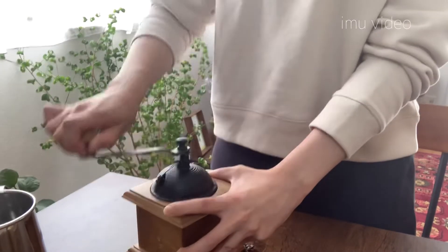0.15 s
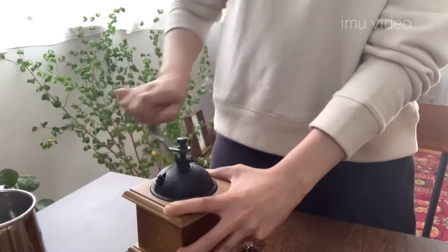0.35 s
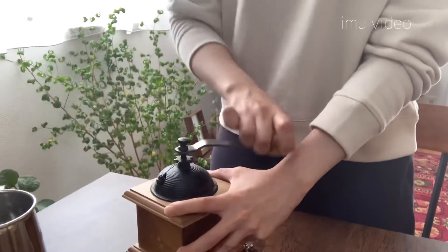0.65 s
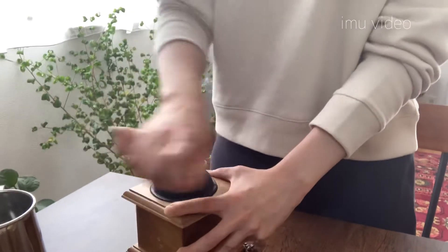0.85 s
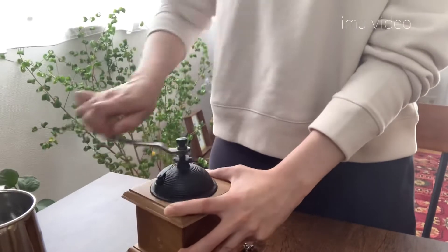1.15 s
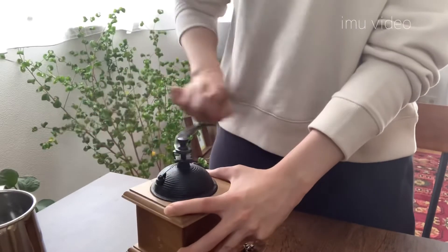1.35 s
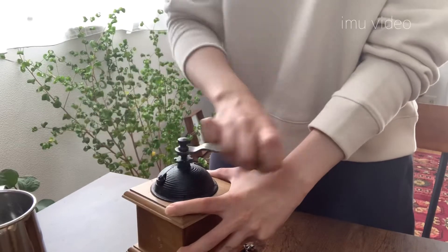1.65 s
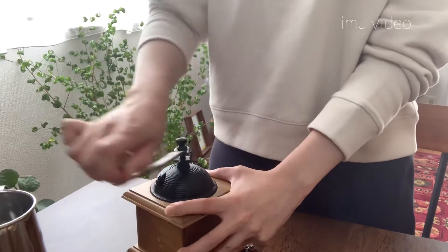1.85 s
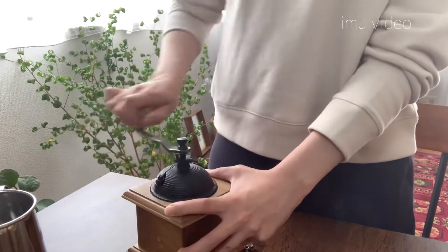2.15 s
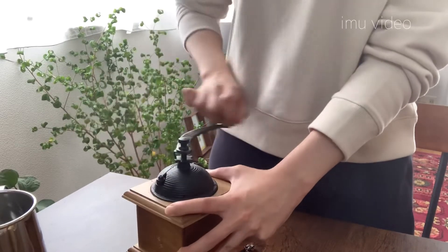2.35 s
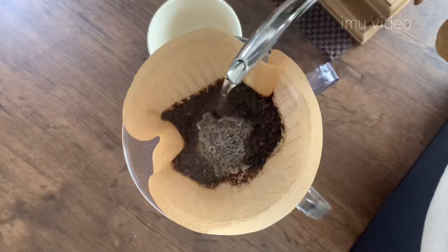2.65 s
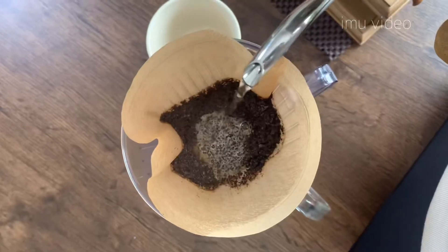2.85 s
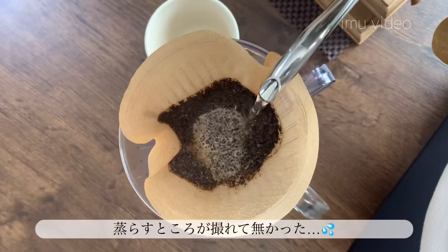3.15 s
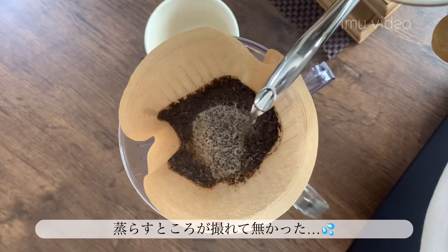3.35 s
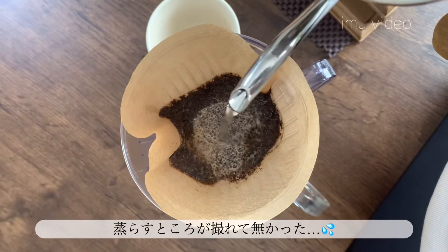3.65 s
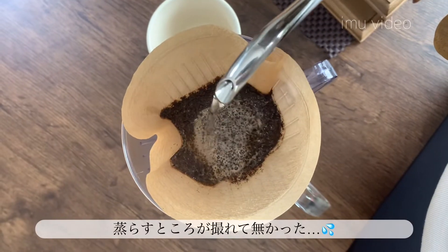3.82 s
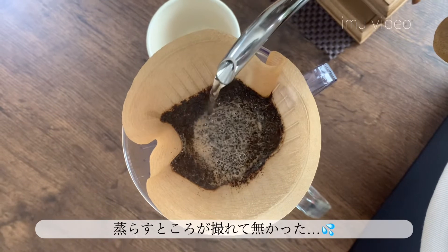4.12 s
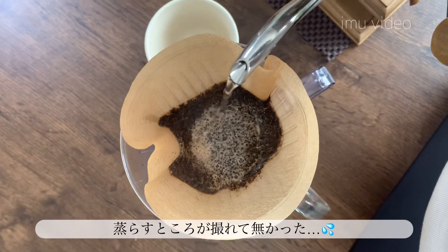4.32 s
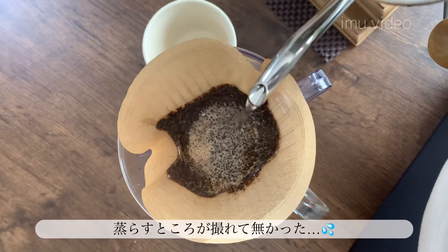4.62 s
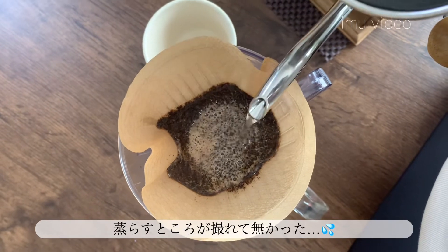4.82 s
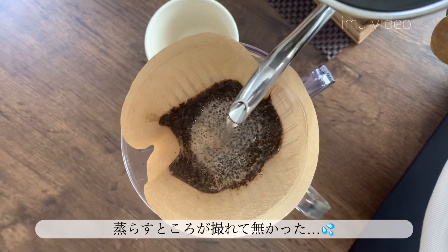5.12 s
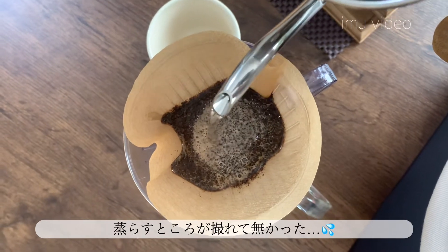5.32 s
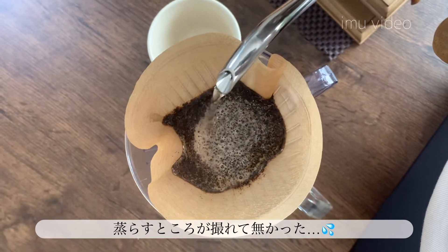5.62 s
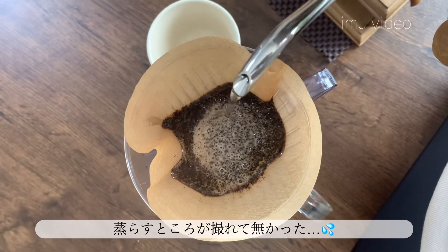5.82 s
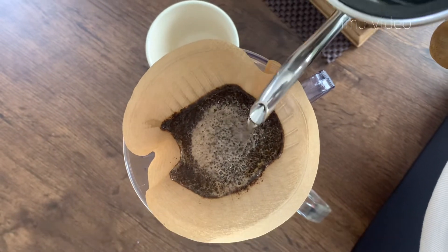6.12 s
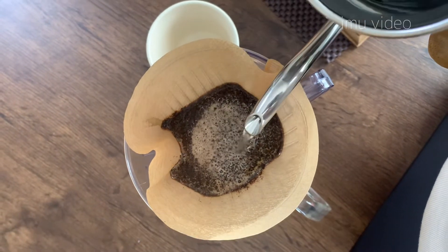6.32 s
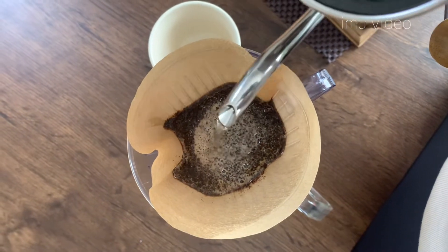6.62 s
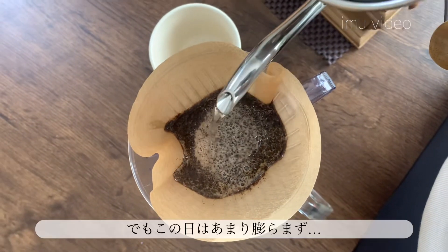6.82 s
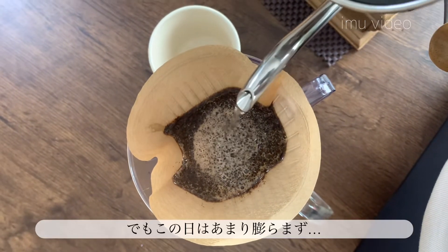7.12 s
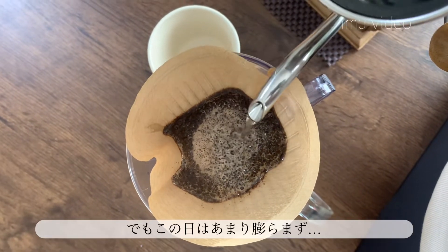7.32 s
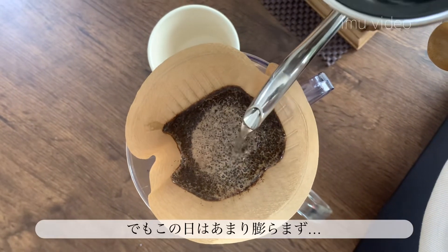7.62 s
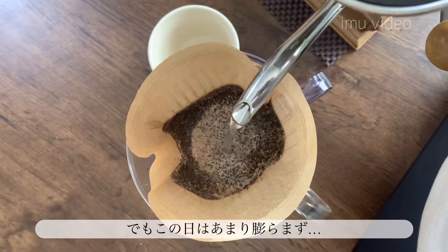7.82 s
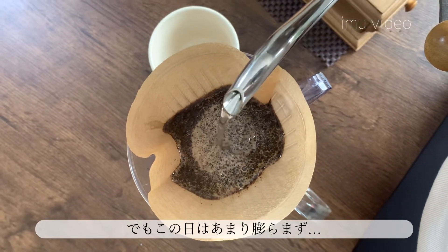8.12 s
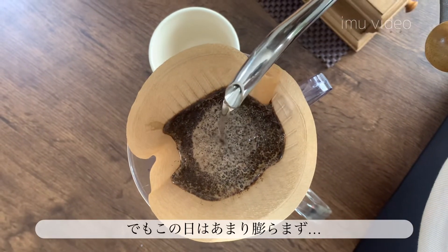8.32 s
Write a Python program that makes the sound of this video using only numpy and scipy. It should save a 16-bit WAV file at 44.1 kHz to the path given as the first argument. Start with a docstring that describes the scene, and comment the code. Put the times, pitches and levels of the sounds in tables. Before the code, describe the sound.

From 0 to about 2.5 seconds a hand-cranked wooden coffee mill grinds beans very close by: a continuous, rough, gritty crunch over low box rumble, punctuated by irregular sharp cracks of splitting beans, brief snaps of hard shards, hollow wooden knocks and short metallic rings from the dome. The cracks are strong around 0.55 to 0.75 and 1.1 to 1.5 seconds. At 2.54 the grinding stops dead, leaving faint low room hum. From 2.7 seconds coffee drips into a glass jug beneath gently poured water: small, rounded, bubbly plips with a glassy ring, sparse until about 3.4, then quicker and overlapping, with fine trickling and tiny high ticks of foam. The drips cluster more densely around 6 to 7 seconds, and a prominent drop lands near 8.26. Dripping continues to the end at about 8.4, in a quiet kitchen with slight reverberation and wide, close stereo.

```python
"""A hand-cranked wooden mill crunches coffee beans: random grains pass box resonances, and splitting beans crack louder.
The mill breaks off; water poured gently on the grounds lets coffee drip into a glass jug. Each drop is a splash and a
decaying bubble tone that excite resonances of air and glass; small drops trickle between, and foam ticks in the treble.
Filtered noise gives the room hum. Two close ports hear the mill and hum as a sum (mid) and difference (side), and the
jug with a phase lead between them."""
import sys
import numpy as np
from scipy import signal
from scipy.fft import rfft, irfft, next_fast_len
from scipy.io import wavfile

SR = 44100
rng = np.random.default_rng(int(sys.argv[2]) if len(sys.argv) > 2 else 0)


def generate_wav(sig):
    """Save sig (samples, or channels by samples) to the path in sys.argv[1] as 16-bit PCM at SR."""
    pcm = np.round(np.clip(np.atleast_2d(sig).T, -1, 1) * 32767).astype(np.int16)
    wavfile.write(sys.argv[1], SR, pcm)


N = 373065
SIZE = next_fast_len(N + SR)   # transform length, with room for echoes
HZ = np.maximum(np.arange(SIZE // 2 + 1) * SR / SIZE, 1)
MILL_END_S, DRIP_START_S = 2.538, 2.69
CUTOFF_HZ = 16450

# Room noise, relative spectral density: (frequency [Hz], level [dB])
HUM_MID_SPECTRUM = [(15, -36.5), (40, -10), (64, -6.5), (255, -1.5), (881, -23.5), (2000, -21.5),
                    (4330, -36), (7300, -38), (8300, -73), (9400, -32.5), (12000, -33.5), (13300, -61),
                    (14800, -41), (16000, -38)]
HUM_SIDE_SPECTRUM = [(15, -43), (40, -14), (291, -5.5), (929, -16), (1550, -17), (3000, -17.5), (5800, -33),
                     (6700, -29), (8600, -21.5), (10200, -29.5), (11200, -43.5), (12200, -24), (14000, -31),
                     (16000, -52)]
# Low appliance tones, as lifts in the noise: (frequency [Hz], width [Hz], lift [dB])
HUM_TONES = [(65.2, 38, 11.5), (140.8, 18, 12), (251.1, 6.4, 10.5), (292, 3, 13), (326.4, 21, 9.5)]
# Coherence of hum side with mid: (frequency [Hz], share in step [1], share a quarter cycle off [1])
HUM_COHERENCE = [(49.6, 0.1, 0.14), (1000, 0.03, 0.06)]
HUM_DB, HUM_SIDE_DB = -63.5, -7.5   # rms of the mid; gain applied to the side spectrum

# Sharp ticks of water and foam: (time [s], level before mixing [dB], centre [Hz], top treble re level [dB])
TICK_EVENTS = [(2.6329, -64.5, 6350, 12.5), (2.684, -58, 10500, -3), (2.7, -58, 5780, 7),
               (2.966, -45.5, 10500, -6), (3.3528, -65, 12200, 8), (3.6229, -50.5, 15300, -3),
               (4.215, -61, 5840, -5), (4.2408, -50, 10800, -21), (4.539, -37.5, 9100, -8.5),
               (4.88, -64, 5830, 2), (4.9247, -54, 5900, -13), (5.0759, -49, 15200, -9),
               (5.728, -51, 5930, -7), (6.0359, -52, 7250, -19), (6.1323, -43.5, 7100, 1.5),
               (6.209, -47.5, 10500, -3), (6.2492, -41, 5930, -25), (6.277, -52, 6060, -5),
               (6.323, -40, 10000, -12), (6.436, -45, 5820, -12), (6.6997, -49.5, 5800, -11),
               (6.8204, -49, 5900, -23), (6.991, -44, 6070, -20), (7.0584, -57, 5800, -23),
               (7.1084, -44, 5820, -24), (7.135, -46, 5900, -25), (7.2152, -30, 5850, -35),
               (7.2755, -48.5, 5930, -0.5), (7.4054, -48, 5830, -9), (7.6195, -36.5, 7310, -8.5),
               (7.682, -49, 5850, -9), (7.7737, -47, 10000, -8), (7.8032, -59, 15600, -7),
               (7.9229, -39, 5810, -8), (7.9723, -49, 7400, -4), (8.101, -50.5, 5700, -5),
               (8.2242, -47, 5840, -13), (8.259, -46, 5970, -23), (8.303, -43, 12600, -2),
               (8.361, -46.5, 6060, 1.5)]
# Faint foam ticks at random: rate, median level re trickle, median pitch, treble re level
FOAM_PER_S, FOAM_DB, FOAM_HZ, FOAM_TOP_DB = 39, -6, 5950, -12
# Small drops between the loud ones: (time [s], level [dB])
TRICKLE_LEVEL = [(2.6, -65.5), (3.24, -91), (3.51, -63.5), (3.82, -83.5), (4.0, -70.5), (4.1, -72),
                 (4.7, -71.5), (4.96, -76.5), (5.23, -66.5), (5.59, -67), (5.88, -62), (6.52, -68.5),
                 (6.73, -64.5), (7.51, -68), (7.81, -62.5), (8.16, -70.5), (8.3, -51.5), (8.46, -72)]
SMALL_PER_S, SMALL_HZ, SMALL_SPREAD = 165, 1806, 0.279   # rate, central pitch, spread of log pitch
# Drops into the jug: (time [s], peak before the ports [dB], bubble pitch [Hz], splash re bubble [dB])
LOUD_DROPS = [(2.701, -39, 2720, -13), (2.719, -48, 2650, -11), (2.731, -52, 2330, -16),
              (2.7744, -48, 1307, -22), (2.807, -50, 1406, -26), (2.834, -55, 1440, -12),
              (2.8335, -61, 3430, -25), (2.87, -62, 3530, -30), (2.9125, -54, 3960, -31),
              (2.9206, -49.5, 1830, -10), (2.925, -51, 1580, -25), (2.9663, -57, 3423, -36),
              (2.9746, -56, 1850, -25), (3.0518, -63, 1880, -32), (3.079, -42, 1840, -28),
              (3.1623, -59, 2260, -7), (3.2147, -57, 1930, -13), (3.2773, -40.5, 1830, -22),
              (3.354, -51, 2040, -29), (3.4003, -67, 1920, -27), (3.414, -58, 2300, -29),
              (3.4526, -35.5, 1970, -19), (3.4645, -41, 1575, -18), (3.5417, -32, 1830, -23),
              (3.5923, -37.5, 1754, -18), (3.6298, -44.5, 1490, -13), (3.6545, -43.5, 1480, -13),
              (3.7744, -48, 2780, -19), (3.8483, -61, 2340, -26), (3.8932, -61, 1880, -20),
              (3.903, -57, 1230, -20), (3.961, -45.5, 1040, -36), (3.9857, -44, 1900, -19),
              (4.0308, -42.5, 1210, -24), (4.1027, -44, 1373, -23), (4.147, -42, 3360, -26),
              (4.214, -40, 2460, -16), (4.25, -35.5, 2070, -21), (4.3026, -39.5, 1645, -20.5),
              (4.3526, -63, 1910, -28), (4.413, -57, 1920, -31), (4.4367, -43, 1830, -24),
              (4.4534, -38.5, 1450, -24), (4.5057, -45, 1740, -35), (4.5373, -40.5, 2130, -13),
              (4.597, -49, 1960, -16), (4.62, -53, 4000, -29), (4.6325, -48.5, 1600, -28),
              (4.6615, -50.5, 1960, -32), (4.6968, -51, 3450, -22), (4.7336, -39, 1715, -20),
              (4.7821, -36, 1900, -24), (4.8204, -44.5, 1375, -39), (4.8798, -41.5, 1720, -21),
              (4.884, -43, 1520, -26), (4.947, -36, 2090, -15.5), (4.988, -57, 3960, -25),
              (5.0226, -58, 1440, -21), (5.072, -54, 4500, -23), (5.0873, -40.5, 1323, -31),
              (5.1325, -41, 1760, -24), (5.155, -34.5, 1835, -20), (5.226, -39, 1530, -19),
              (5.2508, -34, 1740, -19.5), (5.3126, -54, 1710, -31), (5.332, -42, 1283, -42),
              (5.4147, -57, 4250, -33), (5.4511, -54, 1400, -15), (5.499, -55, 1240, -26),
              (5.516, -48, 1850, -26), (5.532, -43, 1280, -17), (5.5828, -50, 1925, -22),
              (5.6491, -43, 1850, -21), (5.656, -48.5, 1560, -21), (5.6902, -44.5, 1488, -32),
              (5.7164, -46.5, 2180, -22), (5.746, -42, 1770, -33), (5.762, -45, 1550, -23),
              (5.7824, -54, 4430, -30), (5.791, -43, 1520, -31), (5.8067, -44.5, 1025, -40),
              (5.8353, -59, 1550, -30), (5.872, -50, 1930, -19), (5.883, -41, 1970, -21),
              (5.9101, -57, 3430, -23), (5.9394, -46, 1900, -24), (5.9584, -35.5, 1990, -23),
              (5.983, -45, 1790, -20), (5.9924, -35.5, 1840, -20.5), (6.012, -51, 1920, -18),
              (6.0403, -43, 1790, -13), (6.0625, -35.5, 1875, -16), (6.088, -48, 1930, -20),
              (6.106, -41, 2200, -21), (6.135, -49, 2000, -17), (6.175, -51, 1460, -22),
              (6.1958, -41, 1790, -23), (6.2113, -42, 1870, -23), (6.2523, -43.5, 1580, -18),
              (6.2838, -43.5, 1530, -11), (6.3235, -45, 2340, -15), (6.341, -38.5, 1985, -9),
              (6.366, -44.5, 2120, -17), (6.4169, -63, 2000, -30), (6.434, -46, 2000, -20),
              (6.4434, -34, 1980, -23), (6.458, -45, 1320, -18), (6.4943, -41, 2040, -35),
              (6.541, -61, 2100, -26), (6.5646, -44, 2000, -12), (6.584, -36, 1670, -20),
              (6.6038, -32, 1710, -25), (6.655, -48, 1520, -24), (6.7008, -35, 1930, -22),
              (6.7264, -34, 2470, -22), (6.748, -36, 1986, -14.5), (6.7781, -38, 1950, -20),
              (6.8232, -42.5, 1890, -13), (6.8484, -42, 1314, -23), (6.875, -40.5, 1660, -34),
              (6.941, -49, 1920, -35), (6.986, -48, 1330, -24), (7.0093, -42, 1314, -25),
              (7.0385, -36.5, 1550, -21), (7.058, -42, 3480, -20), (7.1328, -42, 1840, -16),
              (7.1654, -42.5, 1930, -13), (7.1863, -47.5, 3940, -34), (7.216, -40.5, 1680, -16),
              (7.2507, -42.5, 1390, -28), (7.298, -46, 1420, -23), (7.3368, -52, 1970, -22),
              (7.3797, -57, 1480, -23), (7.4037, -47, 2000, -33), (7.4463, -45.5, 2350, -16),
              (7.471, -51, 2430, -23), (7.5462, -50, 1370, -36), (7.577, -43, 2190, -22),
              (7.6188, -39, 1243, -23), (7.64, -41.5, 1240, -17), (7.6816, -46.5, 1520, -22),
              (7.6922, -40, 1980, -18), (7.7559, -44.5, 2000, -22), (7.7817, -41.5, 1960, -30),
              (7.8262, -39, 2060, -24), (7.846, -50, 1950, -30), (7.864, -51, 2450, -24),
              (7.871, -61, 1310, -30), (7.8831, -39.5, 1210, -34), (7.903, -52, 1400, -28),
              (7.922, -43, 3120, -28), (7.925, -47, 1490, -31), (7.9437, -33.5, 1474, -17),
              (7.986, -49, 2350, -25), (7.9923, -48, 2010, -28), (8.019, -42.5, 2140, -34),
              (8.045, -49, 1330, -33), (8.0572, -44, 1074, -41), (8.111, -42.5, 1390, -38),
              (8.168, -41.5, 1960, -16), (8.1896, -39, 2200, -29), (8.2239, -37, 1625, -33),
              (8.2601, -29.5, 1974, -19.5), (8.2897, -43, 3350, -23), (8.3047, -45, 1980, -24),
              (8.329, -43, 1265, -26), (8.361, -45.5, 1260, -32), (8.3802, -46, 1215, -19),
              (8.428, -42, 3550, -29)]
# A lesser droplet trails each drop: median delay, mean relative level, spread of log pitch
FOLLOWER_S, FOLLOWER_DB, FOLLOWER_SPREAD = .016, -10.5, 0.12
# First contact and spray of a drop: levels re the splash level, decay times
IMPACT_DB, IMPACT_T60_S, SPRAY_DB, SPRAY_T60_S = 12, 0.0045, 8, 0.056
BUBBLE_LOW_HZ = 800   # bubbles radiate little below
# Resonances of air and glass: (frequency [Hz], bandwidth [Hz], median level [dB])
JUG_MODES = [(470, 210, -8.5), (954, 570, -10.5), (1225, 197, -12), (1340, 41, -7), (1463, 177, -8.5),
             (1522.5, 36, -5), (1688, 260, -17), (1931.3, 38, 0), (2271, 33, -4), (2317, 240, -9.5),
             (2628, 41, -4.5), (3056, 46, -13), (3400, 42, -2.5), (4000, 20.3, -9), (4270, 130, -15.5),
             (4470, 41, -14), (5874, 40, -19.5), (7270, 32, -24), (9120, 340, -29)]
# Jug sound of opposite sign at the ports, from a second radiation: (frequency [Hz], level [dB])
JUG_SCATTER_LEVEL = [(200, -10), (700, -6), (1550, -3), (1920, -12), (2200, -4), (4400, -6), (6600, -20),
                     (16000, -22)]
# Path difference from jug to ports: (frequency [Hz], phase lead of the left [rad])
JUG_PHASE_LEAD = [(20, 0.01), (1290, .3), (1600, 1.1), (1920, .6), (2200, 1.2), (3400, 2.0), (6650, 0),
                  (8500, -np.pi), (11200, -2 * np.pi), (13600, -3 * np.pi), (16000, -4 * np.pi)]

# Mill loudness, with swells at the cracks: (time [s], crunch level [dB], box rumble level [dB])
MILL_LEVEL = [(0.0, -43, -48), (0.01, -46, -51), (0.04, -45, -42.5), (0.13, -49, -43.5), (0.14, -45, -47.5),
              (0.39, -43, -41.5), (0.41, -44.5, -41), (0.5, -51, -43), (0.53, -48.5, -41.5),
              (0.57, -44.5, -39.5), (0.59, -33.5, -41.5), (0.62, -46, -41.5), (0.69, -41, -44.5),
              (0.71, -45.5, -42.5), (0.74, -38.5, -33.5), (0.76, -44, -42.5), (0.9, -44.5, -41),
              (1.28, -45, -42), (1.32, -35.5, -37), (1.33, -39, -36.5), (1.43, -48.5, -43),
              (1.45, -45, -39.5), (1.52, -47, -48.5), (1.54, -45.5, -45), (1.56, -44, -40.5),
              (1.75, -47.5, -40.5), (1.77, -35, -39), (1.81, -45.5, -43.5), (1.97, -43, -41),
              (2.03, -47.5, -39), (2.07, -43.5, -44), (2.08, -47, -44.5), (2.21, -42, -41.5),
              (2.43, -50, -43), (2.5, -42.5, -42), (2.52, -46, -43.5)]
# Beans splitting, before trims per band:
# (time [s], crunch level [dB], grit re crunch [dB], dome ring re crunch [dB], box thump re crunch [dB])
BEAN_CRACKS = [(0.0344, -38.5, -9, 2, -9), (0.1419, -31, -21, -21, -16), (0.174, -25, -33, -28, -16),
               (0.2229, -35, -13, -2, -14), (0.248, -33, -14, -14, -22), (0.2952, -34.5, -19, -12, -12),
               (0.3997, -37, -20, 2.5, -15), (0.407, -32.5, -25, 2.5, -5), (0.438, -32, -29, -14, -4),
               (0.4825, -36, -32, -24, -16), (0.5459, -25, -25, -8, -24), (0.576, -29, -29, -4, -15),
               (0.5869, -22.5, -36, -17, -28), (0.6279, -31, -14, -7, -17), (0.665, -22.5, -19, -17, -7),
               (0.7288, -31.5, -16, -28, -14), (0.7435, -24, -7.5, -23, -22), (0.771, -41, -18, -5, -15),
               (0.8054, -34, -18, -23, 1), (0.8125, -24, -13, -18, -4.5), (0.853, -38, -23, 3, -12),
               (0.88, -32, -11, -4, -6), (0.9612, -36, -22, -24, -13), (1.046, -38, -6, -24, -7),
               (1.1131, -24.5, -13, -35, -16), (1.1495, -33, -11, -27, -21), (1.159, -26.5, -9, -40, -21),
               (1.207, -32.5, -11, -22, 4), (1.279, -31, -17, -33, -18), (1.287, -23, -28, -24, -7),
               (1.3062, -31.5, -23, -24, -22), (1.319, -27, -19, -24, -14), (1.3415, -31.5, -14, -14, 12),
               (1.403, -48, -18, -4, -10), (1.4404, -29.5, -19, 0, -25), (1.452, -31, -19, 5, -11),
               (1.468, -23, -31, -21, -10), (1.523, -41.5, -39, 5, -12.5), (1.5417, -34.5, -17, 9.5, -17),
               (1.6117, -33, -16, -10, -16), (1.6926, -35, -17, 2, -1), (1.7416, -33.5, -1, 6, -13),
               (1.7658, -28, -14, -6, -14), (1.7815, -29, -18, -12, -14), (1.831, -27, -16, -20, -15),
               (1.953, -31, -23, -21, -9), (2.0552, -35, -22, -10, -9), (2.067, -28, -15, -2, -18),
               (2.102, -35, -5, -13, -19), (2.148, -39, -19, -11, -15), (2.169, -29, -24, -26, -26),
               (2.183, -26, -30, -22, -9), (2.24, -26.5, -24, -31, -16), (2.2869, -27.5, -39, -7, 12),
               (2.4594, -32.5, -8, -19, -4), (2.48, -43.5, -10.5, -3, -3), (2.4982, -27, -25, -4.5, 8)]
# Mill, relative spectral density: (frequency [Hz], level [dB])
MILL_MID_SPECTRUM = [(24, -5), (44, -5), (141, 1), (228, -3), (307, 0), (560, -1), (1640, -14),
                     (2890, -26.5), (6850, -23.5), (8300, -31.5), (9210, -34), (11400, -7), (14300, -29),
                     (16000, -55.5)]
MILL_SIDE_SPECTRUM = [(24, -23), (44, -12), (113, 2.5), (205, -13.5), (307, -1), (800, -1.5), (2520, -23.5),
                      (4450, -25.5), (6850, -18.5), (7830, -11.5), (8730, -19), (11500, -1), (14200, -50.5),
                      (16000, -80)]
MILL_SIDE_DB = -5   # gain applied to the side spectrum
# Resonances of box, burr and dome: (frequency [Hz], width [Hz], lift [dB])
MILL_RESONANCES = [(141, 52, 2.5), (305, 64, 7.5), (437, 46, 4), (557, 34, 5.5), (607.5, 30, 4),
                   (737, 27, 3), (977, 32, 2.5), (1140, 21, 2.5), (1223, 39, 5), (1470, 59, 4),
                   (1969, 210, 8), (2518, 480, 8), (3240, 67, 9.5), (5680, 54, 1.5), (7884, 770, 22),
                   (11270, 340, 1), (14400, 610, 11)]
# Coherence of mill side with mid: (frequency [Hz], share in step [1], share a quarter cycle off [1])
MILL_COHERENCE = [(40, .7, 0.01), (300, .45, -.1), (600, .1, -.25), (1200, 0.01, -.4), (3000, 0.01, -.55),
                  (6000, 0, -.85), (9500, 0, -.85), (12000, -.3, -.8)]
# Hard shards snapping: (time [s], level before the rise [dB], pitch [Hz])
SHARD_SNAPS = [(0.0348, -41, 2340), (0.1391, -41, 2650), (0.1695, -38, 2620), (0.4369, -36, 2380),
               (0.4843, -38.5, 2240), (0.5467, -32, 2610), (0.5871, -30, 3360), (0.629, -34, 2380),
               (0.6649, -32, 2400), (0.7272, -35, 2440), (0.7442, -27.5, 3210), (0.8131, -36.5, 2290),
               (0.8754, -36, 2260), (0.9353, -41, 3370), (0.9607, -41, 2230), (1.0545, -43, 2570),
               (1.1139, -40, 2510), (1.1598, -32, 3280), (1.2795, -31, 2550), (1.3194, -24, 2560),
               (1.3788, -36, 2540), (1.4022, -36, 2530), (1.4421, -31, 2260), (1.4681, -32.5, 2680),
               (1.5399, -32, 2280), (1.5713, -33, 2370), (1.6482, -32, 2200), (1.6796, -35, 2330),
               (1.7429, -35, 2290), (1.7639, -27, 2260), (1.8312, -31, 4420), (1.8966, -49, 2580),
               (2.0667, -39, 2200), (2.1021, -33, 2270), (2.1685, -30, 2440), (2.2398, -38, 2560),
               (2.2593, -29.5, 2460), (2.4443, -37, 2440), (2.4588, -35, 2430), (2.4972, -38, 2430)]
# Jolts of the burr knocking the wooden box: (time [s], level before the rise [dB], pitch [Hz])
BOX_KNOCKS = [(0.137, -35, 514), (0.148, -32, 520), (0.187, -32.5, 600), (0.299, -29, 570),
              (0.322, -32, 600), (0.418, -31.5, 330), (0.402, -31, 286), (0.52, -29.5, 374),
              (0.59, -27, 536), (0.731, -49, 373), (0.744, -28, 503), (0.777, -38, 520), (0.814, -30, 272),
              (0.949, -35, 556), (1.113, -25.5, 490), (1.244, -31, 516), (1.282, -26.5, 325),
              (1.321, -21.5, 298), (1.344, -24.5, 463), (1.372, -28, 464), (1.404, -27, 430),
              (1.472, -26.5, 327), (1.541, -31, 309), (1.763, -26, 697), (1.781, -28, 720),
              (1.831, -28, 323), (1.862, -31, 400), (1.924, -31, 325), (2.026, -29, 313.4),
              (2.054, -27, 547), (2.145, -25, 514), (2.185, -26.5, 606), (2.21, -31, 595),
              (2.241, -29, 320), (2.358, -34, 238), (2.411, -29, 365), (2.451, -31, 580)]
SHARD_T60_S, SHARD_RISE_S, KNOCK_T60_S, KNOCK_RISE_S = 0.017, 0.00055, 0.045, 0.0013
DOME_HZ, DOME_T60_S = 1908, 0.024
GRIT_DB, GRIT_FOLLOWS = -61, 1.26   # level at mean crunch level; share of the crunch level's swing in dB


def from_db(db):
    """Logarithmic level: 20 dB is a factor of ten in amplitude."""
    return 10 ** (np.asarray(db) / 20)


def rms_one(x):
    """Normalisation to unit root mean square."""
    return x / np.sqrt(np.mean(np.abs(x) ** 2) + 1e-30)


def columns(rows, at, warp=lambda v: v):
    """Linear interpolation of each column against the first, on an optionally warped axis."""
    first, *rest = np.transpose(rows)
    return [np.interp(warp(at), warp(first), c) for c in rest]


def colour(spectrum, modes):
    """Minimum-phase filtering: folding the cepstrum makes a spectrum with resonant lifts causal."""
    db = columns(spectrum, HZ, np.log)[0]
    for hz, width_hz, lift_db in modes:
        db = db + lift_db / (1 + (2 * (HZ - hz) / width_hz) ** 2)
    cepstrum = irfft(np.log(from_db(db)), SIZE)
    cepstrum[1:SIZE // 2] *= 2
    cepstrum[SIZE // 2 + 1:] = 0
    return np.exp(rfft(cepstrum))


def drift(rate_hz):
    """Low-pass noise: a slow random wander of unit spread."""
    spectrum = rfft(rng.standard_normal(SIZE)) / (1 + (HZ / rate_hz) ** 2)
    return rms_one(irfft(spectrum, SIZE)[:N])


def echoes(t60):
    """Diffuse reverberation: the spectrum of exponentially decaying noise, of unit mean power."""
    t = np.arange(SR // 2) / SR
    return rms_one(rfft(rng.standard_normal(len(t)) * from_db(-60 * t / t60), SIZE))


def ports(mid, side, scattered, coherence):
    """Partial coherence: the side shares some phase with the mid and is otherwise diffuse; sum and difference."""
    step, quarter = np.clip(columns(coherence, HZ, np.log), -.98, .98)
    diffuse = np.sqrt(np.clip(1 - step ** 2 - quarter ** 2, 0, 1))
    side = side * (step + 1j * quarter) + diffuse * scattered
    return irfft([mid + side, mid - side], SIZE)[:, :N]


def place(times, sounds):
    """Superposition: short sounds add where they overlap in time."""
    at = (np.asarray(times) * SR).astype(int)[:, None] + np.arange(sounds.shape[1])
    return np.bincount(at.ravel(), sounds.ravel(), N)[:N]


def with_chance(rows, per_s, start, end):
    """Independent arrivals: uniform random moments at a mean rate, each with several normal draws."""
    draws = rng.random((int(per_s * (end - start)), 1))
    return start + draws[:, 0] * (end - start), rng.standard_normal((len(draws), rows)).T


def rings(rows, t60, rise_s):
    """Damped oscillation: each blow rings briefly at a pitch of its own."""
    s, level_db, hz = np.transpose(rows)[:, :, None]
    age = np.arange(3000) / SR
    envelope = from_db(level_db - 60 * age / t60) * (1 - np.exp(-age / rise_s))
    return place(s[:, 0], np.sin(2 * np.pi * hz * age) * envelope)


def hum():
    """Stationary noise through resonant filters: steady room noise with low appliance tones."""
    mid_colour = colour(HUM_MID_SPECTRUM, HUM_TONES)
    side_colour = from_db(HUM_SIDE_DB) * colour(HUM_SIDE_SPECTRUM, HUM_TONES)
    mid_rms = np.sqrt(np.mean(np.abs(mid_colour) ** 2))
    noise = rfft(rng.standard_normal((2, SIZE))) * from_db(HUM_DB) / mid_rms
    return ports(noise[0] * mid_colour, noise[0] * side_colour, noise[1] * side_colour, HUM_COHERENCE)


def ticks():
    """Impulsive excitation: a click rings, sets the top glass modes going and sprays bright noise."""
    foam_s, (size, pitch) = with_chance(2, FOAM_PER_S, MILL_END_S, N / SR)
    foam_db = columns(TRICKLE_LEVEL, foam_s)[0] + FOAM_DB + 9.3 * size
    foam = [foam_s, foam_db, FOAM_HZ * from_db(.4 * pitch), np.full(len(size), FOAM_TOP_DB)]
    s, level_db, hz, top_db = np.hstack([np.transpose(TICK_EVENTS), foam])
    t = np.arange(2000) / SR
    snap = np.sin(2 * np.pi * hz[:, None] * t) * from_db(-60 * t / 0.021) * (1 - np.exp(-t / 0.00048))
    noise = rng.standard_normal((len(s), len(t)))
    tail = (from_db(-60 * t / 0.0084) + from_db(-15.0 - 60 * t / 0.028)) * (1 - np.exp(-t / 0.00049))
    glass = 0
    for mode_hz, width_hz, mode_db in JUG_MODES[-3:]:
        strength = from_db(mode_db + 18.5 + 5.9 * rng.standard_normal((len(s), 1)))
        resonator = signal.iirpeak(mode_hz, mode_hz / (2.0 * width_hz), fs=SR)   # twice the bandwidth here
        glass = glass + strength * signal.lfilter(*resonator, noise * tail)
    treble = signal.butter(2, 7800, "high", fs=SR, output="sos")
    bright = signal.sosfilt(treble, noise) * from_db(top_db)[:, None]
    return place(s, from_db(level_db)[:, None] * (0.5 * snap + 1.74 * glass + 1.7 * bright * tail))


def drops(hz, splash_db):
    """Bubble resonance: a splash and a briefly ringing, rising bubble drive the jug; two radiations, peak 1."""
    size = 3200
    t, grid = np.arange(size) / SR, np.arange(size // 2 + 1) * SR / size
    hz = np.asarray(hz)[:, None]
    chance = np.clip(rng.standard_normal((len(hz), 2 * len(JUG_MODES) + 2)), -1.6, 1.6)
    cycles = 33 * from_db(2.2 * chance[:, -1:])      # cycles to die by 60 dB
    rise = 1.6 * from_db(8.3 * chance[:, -2:-1])     # half the share of the pitch gained per s
    bubble = np.sin(2 * np.pi * hz * t * (1 + rise * np.minimum(t, .03)))
    bubble = bubble * from_db(-60 * t * hz / cycles) * (1 - np.exp(-t / 0.0002))
    spray = from_db(SPRAY_DB - 60 * t / SPRAY_T60_S)
    impact = from_db(IMPACT_DB - 60 * t / IMPACT_T60_S)
    splash = rng.standard_normal((len(hz), size)) * from_db(splash_db[:, None]) * (spray + impact)

    mode_hz, width_hz, mode_db = np.transpose(JUG_MODES)[:, :, None]
    modes = from_db(mode_db) / (1 + 1j * (grid - mode_hz ** 2 / (grid + 1)) / width_hz)
    strength = from_db(4.8 * np.array(np.split(chance[:, :-2], 2, axis=1)))
    strength = strength * (-1.) ** np.arange(len(JUG_MODES))   # neighbouring modes alternate in sign
    strength[1] *= rng.choice([-1, 1], strength[1].shape)      # scattered sound gets each mode in either sign
    direct = from_db(-15.5) / (1 + 1j * grid / 2500) ** 2 * np.sign(strength[:, :, :1])
    bubble_drive = rfft(bubble) * grid ** 2 / (grid ** 2 + BUBBLE_LOW_HZ ** 2)
    splash_drive = rfft(splash) * grid / (grid + 1800)
    sound = irfft((bubble_drive + splash_drive) * (direct + strength @ modes), size)
    return sound / np.abs(sound).max(axis=2, keepdims=True)


def loud_drops():
    """Secondary droplets: each loud drop is trailed by a lesser one of nearby pitch."""
    s, peak_db, hz, splash_db = np.transpose(LOUD_DROPS)
    late, weak, detune = rng.standard_normal((len(s), 3)).T
    s = np.append(s, s + FOLLOWER_S * np.exp(0.42 * late))
    peak_db = np.append(peak_db, peak_db + FOLLOWER_DB + 1.1 * weak)
    hz = np.append(hz, hz * np.exp(FOLLOWER_SPREAD * detune))
    sounds = drops(hz, np.tile(splash_db, 2))
    return np.array([place(s, from_db(peak_db)[:, None] * d) for d in sounds])


def trickle():
    """Modulated random arrivals: many small drops whose level wanders in clumps."""
    s, (pitch, size) = with_chance(2, SMALL_PER_S, DRIP_START_S, N / SR)
    hz = SMALL_HZ * np.exp(SMALL_SPREAD * np.clip(pitch, -1.1, 2.4))
    sounds = from_db(4.8 * size)[:, None] * drops(hz, np.full(len(s), -9.5))
    small = np.array([place(s, d) for d in sounds])
    clumps = from_db(2.5 * drift(9.))
    return rms_one(small * clumps) * from_db(columns(TRICKLE_LEVEL, np.arange(N) / SR)[0])


def jug():
    """Path difference and reverberation: drops, trickle and ticks reach two ports out of phase, with echoes."""
    dripping = loud_drops() + trickle()
    room = from_db(-7) * np.array([echoes(.2), echoes(.2)])
    tick = rfft(ticks(), SIZE) * [np.ones(len(HZ)), echoes(0.02)]
    near, scattered = (rfft(dripping, SIZE) + tick) * (1 + room)
    half_lead = np.exp(.5j * columns(JUG_PHASE_LEAD, HZ)[0])
    scattered = scattered * from_db(columns(JUG_SCATTER_LEVEL, HZ, np.log)[0])
    left = from_db(-2.5) * near * half_lead + scattered
    right = from_db(-1.0) * near / half_lead - scattered
    return irfft([left, right], SIZE)[:, :N]


def grinding_grains():
    """Shot noise: fragments of random size and sign break at a wandering rate, over rubbing powder."""
    sizes = from_db(2.43 * np.minimum(rng.exponential(1, N), 5)) * rng.choice([-1, 1], N)
    per_s = 1500 * from_db(4.5 * drift(40.))
    grains = rms_one(sizes * (rng.random(N) < per_s / SR))
    return rms_one(grains + 0.65 * rng.standard_normal(N))      # ground powder rubs as plain noise


def crushing(mid_colour):
    """Band-wise excitation: grains and bean cracks drive rumble, crunch and grit; spectra for two panels."""
    grains = grinding_grains()
    other_panel = rng.choice([-1, 1], N)      # another panel gets the same blows, unrelated in phase
    crunch_db, rumble_db = columns(MILL_LEVEL, np.arange(N) / SR)
    mean_crunch_db = crunch_db[:int(MILL_END_S * SR)].mean()
    grit_db = GRIT_DB + GRIT_FOLLOWS * (crunch_db - mean_crunch_db)
    s, split_db, high_db, _, low_db = np.transpose(BEAN_CRACKS)
    burst = rng.standard_normal((len(s), 1500))
    age = np.arange(1500) / SR
    above_low, above_mid = 1 / (1 + (900 / HZ) ** 4), 1 / (1 + (6000 / HZ) ** 6)
    # band filter, grain level, crack level, crack decay [s], unevenness [dB]; lows ring longest and run most evenly
    bands = [(1 - above_low, rumble_db, split_db + low_db - 16.5, .06, 1.0),
             (above_low - above_mid, crunch_db, split_db - 9.0, .028, 2.4),
             (above_mid, grit_db, split_db + high_db - 0.5, .017, 2.6)]
    force = 0
    for band, level_db, crack_db, t60, patchy_db in bands:
        shape = from_db(-60 * age / t60) + 0.9 * from_db(-60 * age / 0.004)      # the crumbling and a snap
        shape = shape * (1 - np.exp(-age / 0.0001))
        cracks = place(s, burst * shape * from_db(crack_db)[:, None])
        uneven_db = patchy_db * drift(20.)
        blows = (grains * from_db(level_db + uneven_db) + cracks) * [np.ones(N), other_panel]
        force = force + rfft(blows, SIZE) * band / np.sqrt(np.mean(np.abs(band * mid_colour) ** 2))
    return force


def dome_rings():
    """Modal ringing: each crack leaves the metal dome sounding near its own pitch."""
    s, split_db, _, dome_db, _ = np.transpose(BEAN_CRACKS)
    age = np.arange(1500) / SR
    hz = DOME_HZ * (1 + 0.014 * rng.standard_normal((len(s), 1)))
    envelope = from_db(-60 * age / DOME_T60_S) * (1 - np.exp(-age / 0.00081))
    return place(s, np.sin(2 * np.pi * hz * age) * envelope * from_db(split_db + dome_db + 4.0)[:, None])


def mill():
    """Source and filter: crushing, dome, shards and knocks are coloured by box and dome, then stop."""
    mid_colour = colour(MILL_MID_SPECTRUM, MILL_RESONANCES)
    side_colour = from_db(MILL_SIDE_DB) * colour(MILL_SIDE_SPECTRUM, MILL_RESONANCES)
    force = crushing(mid_colour)
    # dividing by the colour keeps the tabled levels of the pitched sounds in the mid
    dome_gain = np.abs(mid_colour[int(DOME_HZ * SIZE / SR)])
    force = force + rfft(dome_rings(), SIZE) / dome_gain * [[1], [0]]
    shards = rings(SHARD_SNAPS, SHARD_T60_S, SHARD_RISE_S)
    knocks = rings(BOX_KNOCKS, KNOCK_T60_S, KNOCK_RISE_S)
    force = force + rfft(shards + knocks, SIZE) / np.abs(mid_colour) * [[1], [.5]]
    force = force * (1 + from_db(-13) * echoes(.25))
    both = ports(force[0] * mid_colour, force[0] * side_colour, force[1] * side_colour, MILL_COHERENCE)
    return both * np.clip((MILL_END_S - np.arange(N) / SR) / 0.00091, 0, 1)   # fades out within a millisecond


def scene():
    """Superposition of sources: mill, then jug, over the room noise."""
    return mill() + jug() + hum()


def record(dry):
    """Band limitation: a steep low-pass filter removes the top."""
    return signal.sosfilt(signal.cheby2(18, 60, CUTOFF_HZ, fs=SR, output="sos"), dry)


dry = scene()
out = record(dry)
generate_wav(out)
```